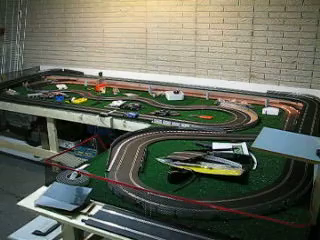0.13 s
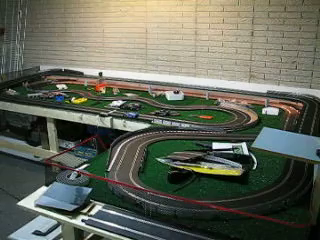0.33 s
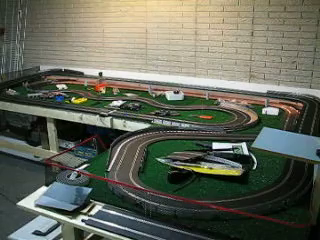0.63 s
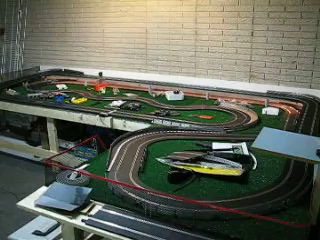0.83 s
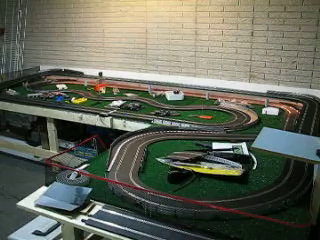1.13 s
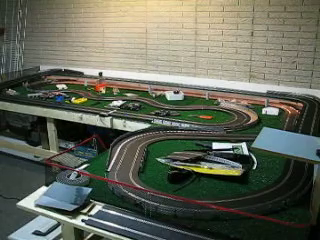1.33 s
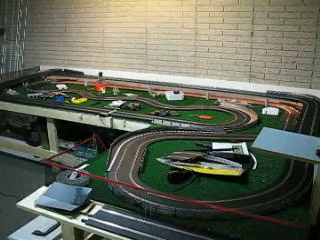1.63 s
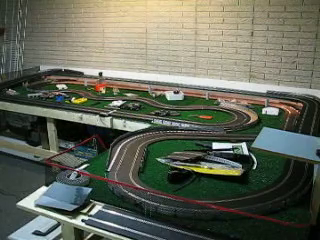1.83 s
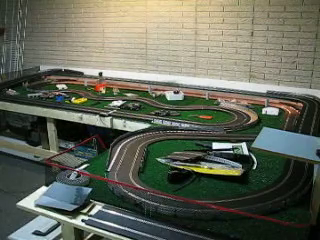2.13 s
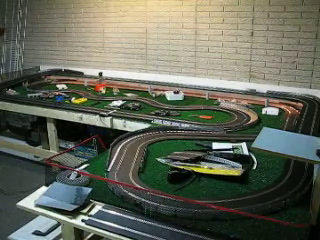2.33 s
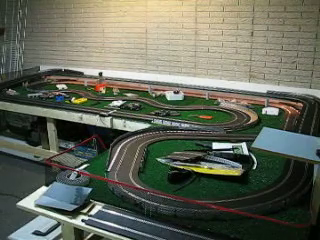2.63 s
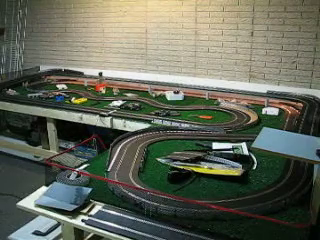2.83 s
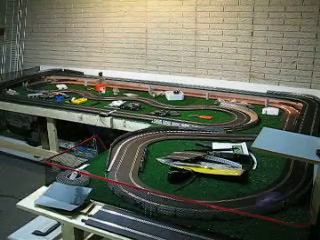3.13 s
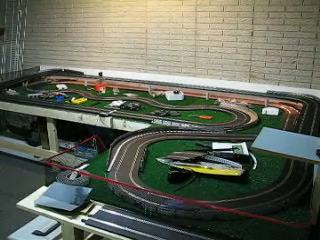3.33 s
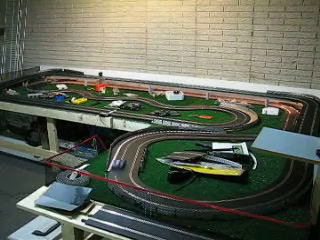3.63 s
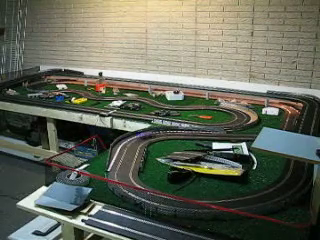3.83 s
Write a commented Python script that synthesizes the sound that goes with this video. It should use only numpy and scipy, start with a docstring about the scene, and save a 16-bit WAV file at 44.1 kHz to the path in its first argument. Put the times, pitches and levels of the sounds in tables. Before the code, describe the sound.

Slot car motor whine surges and drops over plastic track, with bright clacks at the joints.

```python
"""Slot car on a tabletop track

A slot car laps a track in a brick room, speeding up on the straights and braking for the bends.
One speed curve drives the wavering tones of motor and gears and the throb in the grains of rattle,
scrape and rumble. A second whine crosses the first. Shaped noise bursts make the rasps, knocks and
clacks at the track joints; short tones make squeals, panel rings and thumps.
Hiss, mains hum, a faint whirr and a thin whistle lie underneath."""
import sys
import numpy as np
from scipy import signal
from scipy.fft import rfft, irfft
from scipy.io import wavfile

SR = 44100
rng = np.random.default_rng(int(sys.argv[2]) if len(sys.argv) > 2 else 0)


def unload_wav(signal):
    """Save mono or channel-first audio to the path in sys.argv[1] as 16-bit WAV at rate SR, clipped to [-1, 1]."""
    wavfile.write(
        sys.argv[1],
        SR,
        np.round(np.clip(np.atleast_2d(signal).T, -1, 1) * 32767).astype(np.int16),
    )


N = 176400
T = np.arange(N) / SR
HZ = np.fft.rfftfreq(N, 1 / SR)

# motor speed as the pitch of its whine: (time [s], pitch [Hz])
SPEED = [(.45, 700), (.62, 1498), (.67, 1717), (.72, 2020), (.76, 2284), (.8, 2334), (.83, 2000),
         (.89, 1450), (.93, 1098), (.98, 851), (1.08, 950.3), (1.22, 1452), (1.3, 1417), (1.44, 1217),
         (1.52, 1584), (1.65, 1441), (1.74, 1320), (1.86, 1850), (1.93, 2287), (2.03, 2708), (2.12, 3014),
         (2.2, 3142), (2.27, 2263), (2.34, 1900), (2.44, 1384), (2.62, 1380), (2.7, 1297), (2.78, 1420),
         (2.9, 2077), (2.98, 2420), (3.05, 2630), (3.09, 2517), (3.13, 2033), (3.19, 1450), (3.23, 1110),
         (3.35, 1083), (3.49, 1114), (3.55, 1244), (3.69, 1461), (3.8, 1540), (3.9, 1371), (4, 1313)]
# rattle and lowest whine tone along the lap: (time [s], level before trims [dB])
RATTLE_LEVEL = [(0.45, -51), (0.58, -24.5), (0.72, -20.5), (0.8, -27.5), (0.87, -22), (1.02, -31),
                (1.25, -25.5), (1.4, -27.5), (1.42, -25), (1.44, -26.5), (1.5, -28), (1.62, -26.5),
                (1.76, -26), (1.81, -20), (1.85, -25), (1.96, -17.5), (2.02, -23.5), (2.05, -14),
                (2.12, -27.5), (2.14, -15), (2.21, -23), (2.35, -23.5), (2.43, -29), (2.61, -24),
                (2.74, -26), (2.9, -19), (2.93, -24.5), (3.13, -19.5), (3.14, -20.5), (3.24, -27.5),
                (3.8, -20), (4.0, -25.5)]
# scrape and whine overtones along the lap: (time [s], level before trims [dB])
SCRAPE_LEVEL = [(0.48, -55), (0.5, -39), (0.72, -22), (0.9, -27), (1.01, -40.5), (1.2, -29.5),
                (1.31, -26.5), (1.38, -31), (1.42, -23.5), (1.43, -31), (1.54, -32), (1.58, -26),
                (1.76, -31.5), (1.81, -24), (2.02, -22), (2.08, -23), (2.29, -23.5), (2.43, -35),
                (2.47, -28), (2.58, -26), (2.66, -29.5), (2.79, -28), (2.85, -23.5), (3.03, -21.5),
                (3.08, -26), (3.198, -24), (3.22, -35.5), (3.47, -30.5), (3.48, -26.5), (3.92, -25),
                (4.0, -29.5)]

JITTER_HZ = 195.5  # rate limit of the pitch wavering
SQUEAL_JITTER = 0.01484  # rms pitch wavering of squeals and second whine, as a fraction


def amp(db):
    """Decibels to gain."""
    return 10 ** (np.asarray(db) / 20)


def unit(x):
    """Scales to rms 1."""
    return x / np.sqrt(np.mean(x ** 2) + 1e-20)


def curve(points):
    """A control over time, straight lines between the points."""
    return np.interp(T, *np.transpose(points))


def read(points, hz):
    """A table read on a log-frequency axis."""
    f, value = np.transpose(points)
    return np.interp(np.log(hz + 1), np.log(f), value)


def colour(x, points):
    """Filters by a spectrum that falls away beyond its ends, keeping the power of white noise."""
    lowest, highest = points[0][0], points[-1][0]
    top = 1 / (1 + (HZ / highest / 2) ** 4)
    bottom = HZ ** 2 / (HZ ** 2 + (lowest / 2) ** 2)
    return irfft(rfft(x) * unit(amp(read(points, HZ)) * top * bottom), N)


def wander(hz):
    """Smooth random movement of rms 1, up to about the given rate."""
    return unit(irfft(rfft(rng.standard_normal(N)) / (1 + (HZ / hz) ** 4), N))


def tone(turns):
    """A sine of rms 1 from its phase in turns."""
    return np.sqrt(2) * np.sin(2 * np.pi * turns)


def flutter():
    """Random swelling of a whine's loudness, rms 1."""
    depth_db, rate_hz = 5, 61
    return unit(amp(depth_db * wander(rate_hz)))


def pair(x):
    """Makes two unrelated signals alike in the bass and nearly unrelated in the treble."""
    # stereo likeness: (frequency [Hz], left-right correlation)
    likeness = [(60, 1), (125, 0.97), (250, 0.98), (500, 0.95), (1000, 0.83), (2000, 0.53), (4000, 0.14),
                (8000, -0.015), (14000, -0.21)]
    a, b = rfft(x)
    same = read(likeness, HZ)
    mid = a * np.sqrt((1 + same) / 2)
    side = b * np.sqrt((1 - same) / 2)
    return irfft(np.array([mid + side, mid - side]), N)


def background():
    """Coloured-noise room hiss, a steady mains hum, and a whirr and whistle of wavering pitch."""
    # hiss spectrum: (frequency [Hz], relative density [dB per Hz])
    hiss_colour = [(25, -13), (59, -25), (91, -12), (350, -12), (680, -17.5), (850, -16), (1270, -22.5),
                   (4700, -25.5), (7500, -26), (9500, -30), (13000, -33), (15500, -44)]
    hiss_db, hum_db, whirr_db, whistle_db = -57.5, -57.5, -66, -58
    hum_hz, whirr_hz, whistle_hz = 59.2, 820, 8265
    noise = np.array([colour(rng.standard_normal(N), hiss_colour) for _ in range(2)])
    hiss = amp(hiss_db) * pair(noise)
    hum = amp(hum_db) * tone(hum_hz * T)
    whirr = amp(whirr_db) * tone(whirr_hz * np.cumsum(1 + 0.014 * wander(80)) / SR)
    whistle = amp(whistle_db) * tone(whistle_hz * np.cumsum(1 + 0.0032 * wander(120)) / SR)
    return hiss + hum + whirr + whistle


def strike(s, rise_s, decay_s):
    """An envelope that rises in a straight line and dies away exponentially."""
    rise = np.clip((T - s) / rise_s, 0, 1)
    return rise * np.exp(-np.maximum(T - s - rise_s, 0) / decay_s)


def blows(rows, spectrum, rise_s, decay_s):
    """Short bursts of coloured noise."""
    shape = sum(amp(db) * strike(s, rise_s, decay_s) for s, db, *_ in rows)
    return colour(shape * rng.standard_normal(N), spectrum)


def rings(rows, rise_s, decay_s):
    """Each struck panel rings briefly and unsteadily at its own pitch."""
    waver = 0.1226  # rms, as a fraction of the pitch
    clock = np.cumsum(1 + waver * wander(JITTER_HZ)) / SR
    return sum(amp(db) * strike(s, rise_s, decay_s) * tone(hz * clock) for s, db, hz in rows)


def brushes():
    """Faint noisy rasps as the car sets off."""
    # rasps: (time [s], level [dB])
    rasps = [(.296, -50), (.445, -44), (.47, -42), (.493, -48)]
    # rasp spectrum: (frequency [Hz], relative density [dB per Hz])
    rasp_colour = [(500, -3), (1500, -4), (3800, 0), (4800, -3), (5800, -10), (8000, -9), (14000, -35)]
    return blows(rasps, rasp_colour, rise_s=0.014, decay_s=0.07)


def knocks():
    """Dull knocks of the track on the table: a noise burst and a short panel ring."""
    # knocks: (time [s], level before ring trim [dB], ring pitch [Hz])
    hits = [(.328, -44, 333), (.822, -27, 380), (1.58, -33.5, 417.4), (1.792, -28, 480),
            (1.938, -35.5, 480), (2.87, -35, 440), (2.94, -33, 280)]
    # knock spectrum: (frequency [Hz], relative density [dB per Hz])
    knock_colour = [(50, 3), (130, 6), (220, 7.5), (380, 8.5), (600, 11), (1500, -5), (4000, -40)]
    rise_s, ring_db = 0.0039, -1
    burst = blows(hits, knock_colour, rise_s, decay_s=0.025)
    return burst + amp(ring_db) * rings(hits, rise_s, decay_s=0.023)


def level(points):
    """Gain along the lap, silent until the car sets off."""
    start_s, fade_s = 0.407, 0.021
    return amp(curve(points)) * np.clip((T - start_s) / fade_s, 0, 1)


def partial(turns, k, blur):
    """One multiple of the whine, its phase smeared by a random number of turns, its level fluttering."""
    blur_hz = 346
    return tone(k * turns + rng.random() + blur * wander(blur_hz)) * flutter()


def whine(turns):
    """The unsteady tone of motor and gears; its rougher overtones ring the plastic shell."""
    # lowest tone against the rattle: (time [s], relative level [dB])
    sing = [(.5, -16), (.7, 0.5), (.8, 0), (.9, 0), (.98, -6.5), (1.05, -14), (1.25, 5), (1.45, -11),
            (1.64, 2), (1.85, -19), (2.25, -11), (2.55, -7), (2.7, -16.5), (2.8, -1), (2.99, -2.5),
            (3.1, -24), (3.14, 7), (3.21, -4), (3.35, -1.5), (3.48, 0.5), (3.55, -9), (3.8, -2), (4, -7)]
    # overtones against the scrape: (time [s], relative level [dB])
    bite = [(.5, -4), (.77, -4.5), (.9, -1.5), (1.3, -2.5), (1.8, -8), (2.0, 1.5), (2.12, -8), (2.28, 1.5),
            (2.6, -5), (2.8, -0.5), (3.05, -8.5), (3.13, -30), (3.35, -0.5), (3.55, -0.5), (3.7, 2),
            (4, -4.5)]
    # overtones from the second multiple up: relative level [dB]
    overtones = [-2.65, -2.5, -8]
    # resonance of the plastic shell: (frequency [Hz], relative level [dB])
    shell = [(1000, -4), (2100, 1.5), (2550, 1.5), (2900, -11.5), (3280, 0.5), (3800, -9), (4500, -8),
             (5200, 3), (6000, -1), (7000, 3.5), (7750, -0.5), (8600, -3), (14000, -32)]
    low_db, high_db = -2, 0.5
    low_blur, high_blur = 0.04, 0.096  # rms turns; loose gear teeth smear the overtones more
    low = partial(turns, 1, low_blur) * amp(low_db + curve(sing)) * level(RATTLE_LEVEL)
    high = 0
    for k, db in enumerate(overtones, start=2):
        shell_db = read(shell, k * curve(SPEED))
        high = high + partial(turns, k, high_blur) * amp(db + shell_db)
    return low + high * amp(high_db + curve(bite)) * level(SCRAPE_LEVEL)


def grit(turns):
    """Tiny impacts over a wash, bunched once per motor turn and chattering with the chassis."""
    grains_per_s, grain_spread_db, wash_share = 3000, 2.5, 0.52  # share of the power
    throb, pulses_per_turn = 0.2, 6  # six whine cycles to a motor turn
    chatter_db, chatter_hz = 1.56, 50
    size = amp(grain_spread_db * np.minimum(rng.exponential(1, N), 3.5))
    clicks = (rng.random(N) < grains_per_s / SR) * size * rng.choice([-1, 1], (2, N))
    wash = rng.standard_normal((2, N))
    grains = pair(np.sqrt(1 - wash_share) * unit(clicks) + np.sqrt(wash_share) * wash)
    bunching = 1 + throb * np.cos(2 * np.pi * turns / pulses_per_turn)
    return unit(grains * bunching * amp(chatter_db * wander(chatter_hz)))


def running(turns):
    """Gears rattle, braids scrape on the rails, the wheels rumble on the track and drum the table."""
    # spectra of the four layers: (frequency [Hz], relative density [dB per Hz])
    rattle_colour = [(300, -19), (700, -11), (900, -2), (1150, -1.5), (1500, 0.5), (2000, -2), (2450, -0.5),
                     (2950, -7), (3300, -4), (4200, -10.5), (6000, -25.5)]
    scrape_colour = [(1500, -15.5), (3000, -12.5), (4000, -9), (4800, -7), (5650, -1.5), (6300, -3.5),
                     (7250, 1), (8000, -4), (9000, -10), (10000, -17), (11200, -22), (12500, -18),
                     (14000, -27), (15500, -89)]
    rumble_colour = [(200, -20.5), (280, -3), (340, 0), (440, 3), (600, -1), (800, 2.5), (1300, -12),
                     (3000, -11.5)]
    drum_colour = [(45, -12), (80, -3), (125, -1.5), (165, -3), (210, -4.5), (400, -9)]
    # wheel rumble and table drumming: (time [s], level before trims [dB])
    rumble_level = [(0.44, -61), (0.68, -46), (0.81, -47), (0.83, -43), (1.01, -54), (1.21, -42.5),
                    (1.59, -39.5), (1.72, -35.5), (1.83, -29.5), (1.97, -29), (2.05, -33), (2.23, -27.5),
                    (2.43, -41), (2.84, -35), (2.89, -29.5), (3.32, -48.5), (3.63, -42), (4.0, -42)]
    drum_level = [(0.44, -55.5), (0.69, -44.5), (0.84, -50), (0.95, -53.5), (2.0, -46.5), (2.27, -51),
                  (3.03, -47), (3.18, -52), (3.88, -46.5), (4.0, -51)]
    rattle_db, scrape_db, rumble_db, drum_db = -1.98, 3.5, -0.5, 0.5  # trims
    rattle = colour(grit(turns), rattle_colour) * amp(rattle_db) * level(RATTLE_LEVEL)
    scrape = colour(grit(turns), scrape_colour) * amp(scrape_db) * level(SCRAPE_LEVEL)
    rumble = colour(grit(turns), rumble_colour) * amp(rumble_db) * level(rumble_level)
    drumming = colour(grit(turns), drum_colour) * amp(drum_db) * level(drum_level)
    return rattle + scrape + rumble + drumming


def second_whine():
    """Another motor: a single fluttering tone with a speed of its own."""
    # second whine: (time [s], pitch [Hz], level [dB])
    path = [(.51, 1436, -43), (0.559, 1592, -35), (.72, 1711, -33), (0.951, 1531, -34.5), (1.05, 1688, -39),
            (1.1, 1945, -32), (1.16, 2372, -38.5), (1.4, 2463, -33), (1.55, 2426, -43.5), (2.45, 2693, -39),
            (2.66, 2512, -31), (2.8, 2590, -44)]
    s, hz, db = np.transpose(path)
    waver = 1 + SQUEAL_JITTER * wander(JITTER_HZ)
    turns = np.cumsum(np.interp(T, s, hz) * waver) / SR
    sounding = (T > s[0]) * (T < s[-1])
    return tone(turns) * flutter() * amp(np.interp(T, s, db)) * sounding


def clacks():
    """The guide clacks over track joints: short, bright noise bursts."""
    # clacks: (time [s], level [dB])
    joints = [(.819, -25), (1.184, -20), (1.413, -17), (1.575, -19.5), (1.795, -20.5), (2.05, -32),
              (2.14, -12), (2.222, -16), (2.268, -24), (2.473, -14.5), (2.5, -20), (2.595, -11.5),
              (3.106, -17.5), (3.186, -15), (3.625, -16.5), (3.745, -14.5), (3.904, -24)]
    # clack spectrum: (frequency [Hz], relative density [dB per Hz])
    clack_colour = [(200, -6), (800, -15), (1500, 1), (2500, 1), (4500, 1), (7300, 4), (9500, -5),
                    (13000, -19), (15500, -30)]
    return blows(joints, clack_colour, rise_s=0.0041, decay_s=0.0059)


def squeals():
    """Rough chirps of the car in the bends: wavering tones that swell and fade."""
    # squeals: (time [s], length [s], pitch [Hz], level [dB])
    chirps = [(1.05, 0.0066, 1673, -22), (1.087, 0.0073, 1900, -23), (1.401, 0.035, 2460, -22)]
    clock = np.cumsum(1 + SQUEAL_JITTER * wander(JITTER_HZ)) / SR
    total = 0
    for s, length, hz, db in chirps:
        swell = np.sin(np.pi * np.clip((T - s) / length, 0, 1))
        total = total + amp(db) * swell * tone(hz * clock)
    return total


def thumps():
    """Low thumps of the tabletop: slow-starting panel rings."""
    # thumps: (time [s], level [dB], ring pitch [Hz])
    table_hits = [(1.93, -39, 85), (2.32, -39, 135), (3.05, -52, 80.6)]
    return rings(table_hits, rise_s=0.018, decay_s=0.048)


def room(x, count=5):
    """Direct sound plus short decaying-noise wall reflections, random tails taking turns at a steady rate."""
    # reverberation: (frequency [Hz], time to fall 60 dB [s])
    decay = [(150, 0.32), (1000, 0.29), (4000, 0.3), (12000, 0.31)]
    wet_db, delay_s, turns_per_s = -2, 0.004, 25
    wet = 0
    for k in range(count):
        hz, t, z = signal.stft(rng.standard_normal((2, SR // 2)), SR, nperseg=256)
        fade = amp(-60 * t / read(decay, hz)[:, None]) * (t > delay_s)
        tail = signal.istft(z * fade, SR, nperseg=256)[1]
        # the tails follow a fixed cycle, each crossfading into the next
        away = (T * turns_per_s + k) % count - 1
        share = np.cos(np.pi / 2 * np.minimum(away, 1))
        wet = wet + signal.fftconvolve(x * share, tail / np.linalg.norm(tail[0]), axes=1)[:, :N]
    return (x + amp(wet_db) * pair(wet)) / np.sqrt(1 + amp(wet_db) ** 2)


def scene():
    """One motor speed drives whine and running noise; separate blows and squeals join them in the room."""
    # the car's place from left to right: (time [s], left minus right [dB])
    pan = [(.5, 1), (1.7, 1.8), (2.3, 0.5), (3.1, 0.1), (3.8, 1.5)]
    speed_jitter = 0.017  # rms, as a fraction
    turns = np.cumsum(curve(SPEED) * (1 + speed_jitter * wander(JITTER_HZ))) / SR
    car = brushes() + knocks() + whine(turns) + running(turns)
    car = car + second_whine() + clacks() + squeals() + thumps()
    return room(car) * amp(np.outer([0.5, -0.5], curve(pan))) + background()


def record(dry):
    """The two channels differ in colour; the highest peaks are rounded off; then the band limit."""
    # channel colour: (frequency [Hz], left minus right [dB])
    ports = [(60, -0.5), (300, -1), (1000, -1.6), (1800, -4), (2700, -3), (4200, -3), (5600, -2), (7000, 0),
             (8500, -10.5), (10000, -11), (12000, 2), (15000, 12)]
    ceiling, edge_hz = 0.8, 15500
    lean = amp(read(ports, HZ))
    sides = np.array([lean, np.ones_like(lean)]) * np.sqrt(2 / (1 + lean ** 2))
    heard = irfft(rfft(dry) * sides, N)
    heard = heard / (1 + (heard / ceiling) ** 6) ** (1 / 6)
    lowpass = signal.firwin(511, edge_hz, window=("kaiser", 9), fs=SR)
    return signal.oaconvolve(heard, lowpass[None], "same")


dry = scene()
out = record(dry)
unload_wav(out)
```